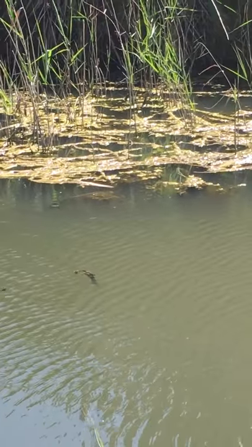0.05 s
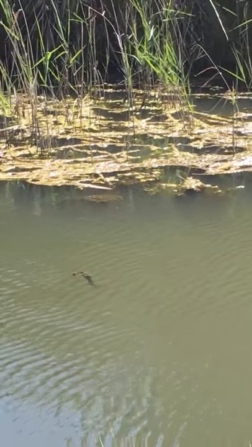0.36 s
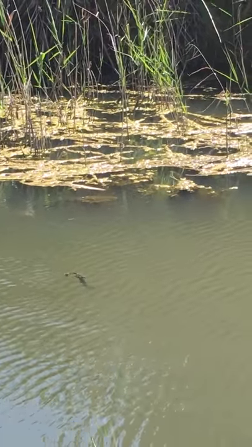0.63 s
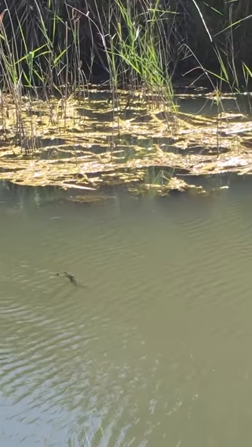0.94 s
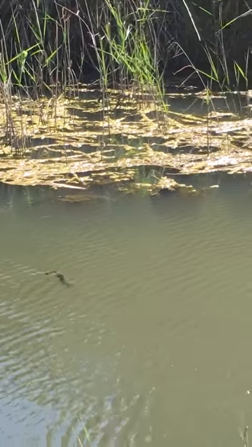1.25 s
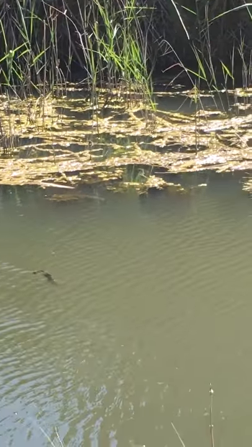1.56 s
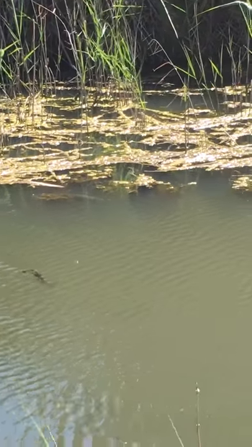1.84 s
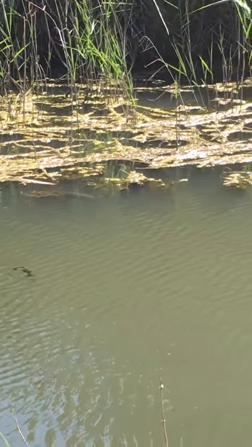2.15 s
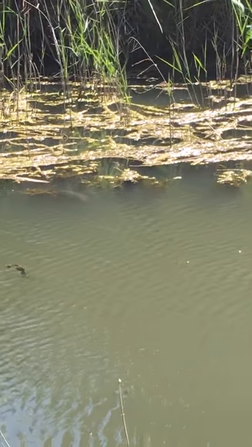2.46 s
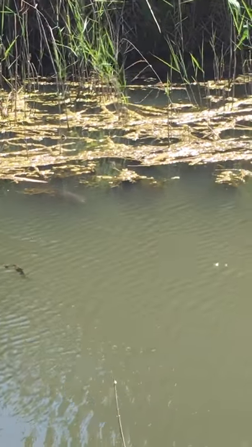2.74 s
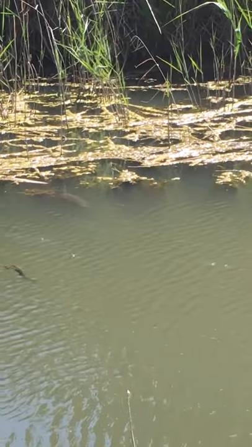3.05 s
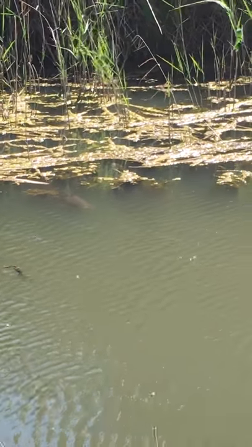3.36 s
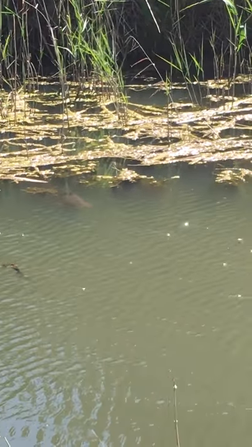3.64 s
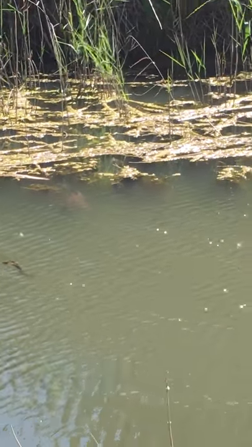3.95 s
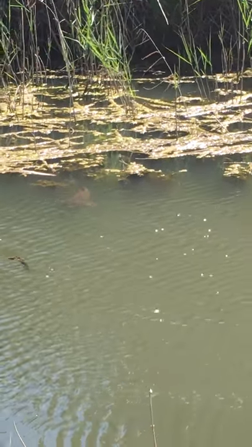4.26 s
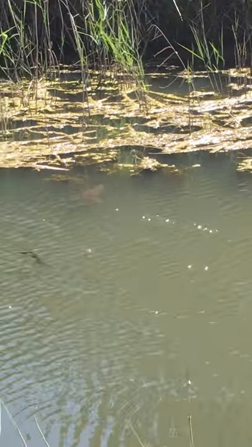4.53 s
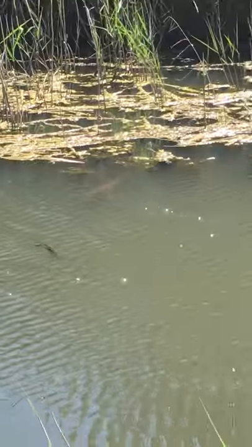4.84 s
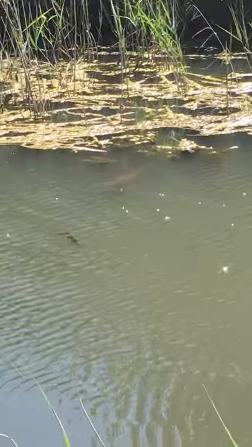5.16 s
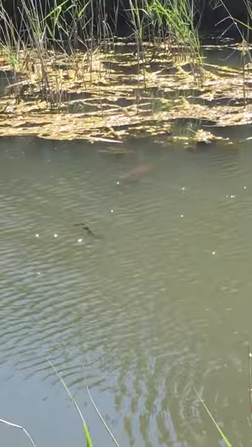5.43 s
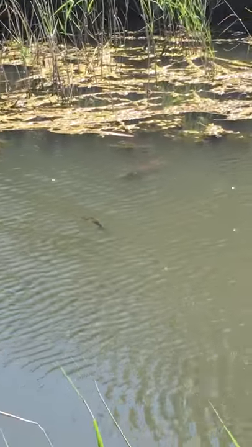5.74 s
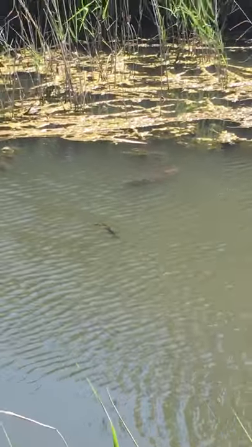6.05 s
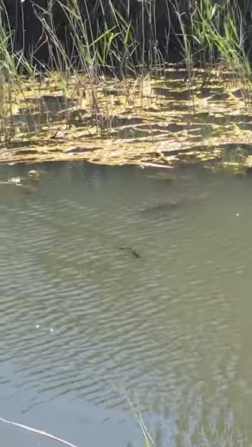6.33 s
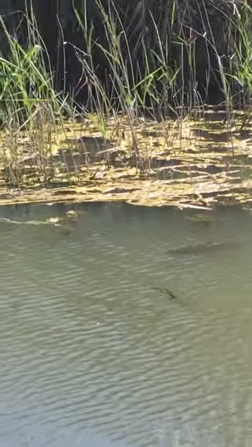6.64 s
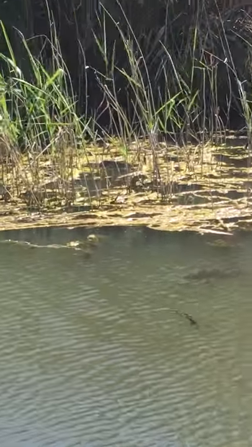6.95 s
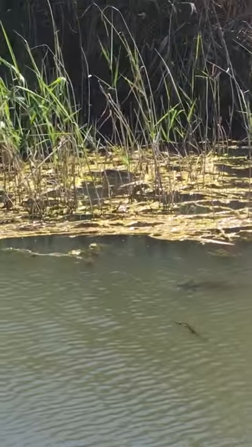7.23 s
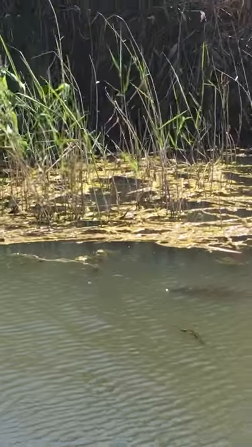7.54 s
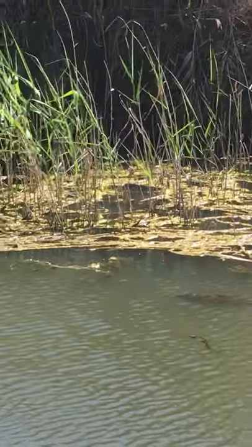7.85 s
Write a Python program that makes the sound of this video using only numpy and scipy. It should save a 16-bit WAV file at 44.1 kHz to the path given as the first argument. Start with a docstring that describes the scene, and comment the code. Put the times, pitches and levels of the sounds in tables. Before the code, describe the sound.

Wind gusts rumble and thump on the microphone while faint, distant birds chirp and whistle over a soft hiss of reeds.

```python
"""Gusts rumble and thump on the microphone beside a reedy pond.
Turbulence makes the rumble, single eddies the thumps; reed leaves brush together in a soft hiss.
Distant birds call across the water with a thin echo: falling chips, a rasp followed by a short pip,
slurs, level whistles and faint chatter. A small bird adds a thin, fluttering 'tsip'."""
import sys
import numpy as np
from scipy import signal
from scipy.fft import rfft, irfft, next_fast_len
from scipy.io import wavfile
from scipy.ndimage import uniform_filter1d, map_coordinates

SR = 44100
rng = np.random.default_rng(int(sys.argv[2]) if len(sys.argv) > 2 else 0)


def output_pcm(signal):
    """Save a mono or channel-first signal as 16-bit PCM at the path in sys.argv[1].

    Samples are clipped to [-1, 1] before scaling.
    """
    pcm = np.clip(np.atleast_2d(signal).T, -1, 1) * 32767
    wavfile.write(sys.argv[1], SR, np.round(pcm).astype(np.int16))


N = 352359
T = np.arange(N) / SR


def undb(db):
    """Decibels to gain."""
    return 10 ** (np.asarray(db) / 20)


def unit_rms(x):
    """Scale to rms 1."""
    return x / np.sqrt(np.mean(x ** 2))


def curve(table):
    """Interpolate (t/s, value) rows to one value per sample."""
    return np.interp(T, *np.transpose(table))


def colour(x, spectrum):
    """Filter by (f/Hz, level/dB) rows; rms 1."""
    hz, db = np.transpose(spectrum)
    size = next_fast_len(len(x))
    bins_hz = np.maximum(np.fft.rfftfreq(size, 1 / SR), 1)
    gain = undb(np.interp(np.log(bins_hz), np.log(hz), db))
    return unit_rms(irfft(rfft(x, size) * gain, size)[:len(x)])


def drift(rate_hz, size=N):
    """Smooth random signal, spread near 1."""
    knots = rng.standard_normal(size // 40 + 3)
    return map_coordinates(knots, [np.arange(size) * rate_hz / SR], order=2, mode="mirror")


def add(out, start_s, sound):
    """Mix a sound in at start_s."""
    i = max(int(start_s * SR), 0)
    part = sound[:max(N - i, 0)]
    out[i:i + len(part)] += part


def tone(hz):
    """Sine along a pitch track; rms 1."""
    return np.sqrt(2) * np.sin(2 * np.pi * np.cumsum(hz) / SR)


# Breeze between gusts: t/s, rumble level/dB
BREEZE_LEVELS = [(0.0, -47), (1.2, -44.5), (2.5, -34), (3.9, -45), (4.7, -45), (5.7, -40.5), (6.6, -52),
                 (7.99, -49.5)]
# Gusts: t/s at full strength, hold/s, rumble level/dB, upper bass/dB re rumble
GUST_EVENTS = [(0.124, 0.072, -40.5, -30), (0.737, .05, -39.5, -23), (1.163, .03, -38.5, -28),
               (1.45, 0.11, -27, -27), (1.586, .055, -26.5, -15.5), (1.812, 0.055, -23.5, -16.5),
               (2.001, 0.23, -27, -20), (2.222, 0.042, -20, -7.5), (2.313, 0.094, -19, -4),
               (2.428, 0.05, -25.5, -6), (2.518, 0.049, -26.5, -4.5), (2.607, 0.083, -22.5, -3),
               (2.732, .035, -25.5, -6), (2.913, .115, -30, -10.5), (3.109, 0.022, -42, -10.5),
               (3.21, 0.029, -33.5, -35), (3.325, 0.046, -30.5, -15), (3.424, 0.029, -25, -17.5),
               (3.593, 0.01, -26, -18.5), (3.652, 0.053, -23, -20.5), (4.144, 0.03, -30, -28),
               (4.233, 0.062, -34, -34), (4.388, 0.0076, -27, -25), (4.448, 0.081, -34.5, -27),
               (4.853, .05, -27.5, -18), (4.925, 0.013, -15, -10.5), (4.962, .11, -21.5, -8),
               (5.173, 0.013, -27.5, -19.5), (5.247, 0.0071, -22, -17), (5.469, 0.031, -24, -19.5),
               (5.768, 0.045, -26.5, -20.5), (5.991, 0.17, -34.5, -25), (6.374, 0.037, -39, -22.5),
               (7.426, .02, -42, -21), (7.714, 0.0093, -32, -28)]


def airflow(attack_tau_s=0.017, release_tau_s=0.016, sway_db=3.5, flap_db=1.5, breeze_bright_db=-22):
    """Gusts rise, flap and die over a swaying breeze. Returns rumble and upper-bass levels in dB."""
    rumble = undb(curve(BREEZE_LEVELS) + sway_db * drift(18))
    upper = rumble * undb(breeze_bright_db)
    for s, hold_s, db, bright_db in GUST_EVENTS:
        rise = np.minimum(T - s, 0) / attack_tau_s
        fall = np.maximum(T - s - hold_s, 0) / release_tau_s
        envelope = np.exp(rise - fall)
        rumble = np.maximum(rumble, undb(db) * envelope)
        upper = np.maximum(upper, undb(db + bright_db) * envelope)
    flapping_db = flap_db * drift(35.55)
    return 20 * np.log10(rumble) + flapping_db, 20 * np.log10(upper) + flapping_db


# Turbulence spectrum: f/Hz, relative level/dB
TURBULENCE_SPECTRUM = [(20, -54), (35, 0), (58, 8.5), (110, 5), (190, -2.5), (300, -9), (550, -24),
                       (800, -36.5), (1400, -53.5), (2600, -84)]


def wind(rumble_db, upper_db, splits_hz=(85, 220, 420), strong_db=-29, flutter_db=-2, patchy_db=5.5):
    """Turbulence on the microphone: stronger gusts bring smaller eddies, so a brighter sound."""
    flow = colour(rng.standard_normal(N), TURBULENCE_SPECTRUM)
    lowpasses = (signal.butter(4, hz, fs=SR, output="sos") for hz in splits_hz)
    deep, low, mid = (signal.sosfiltfilt(sos, flow) for sos in lowpasses)
    rumble = deep + (low - deep) * undb(0.74 * (rumble_db - strong_db))
    flutter = mid - low + (flow - mid) * undb(0.77 * (upper_db - strong_db))
    # mean pressure follows the gust closely; only the eddies are random
    rumble, flutter = (x / np.sqrt(uniform_filter1d(x ** 2, size=1800)) for x in (rumble, flutter))
    return rumble * undb(rumble_db) + flutter * undb(upper_db + flutter_db + patchy_db * drift(110))


# Hardest eddies: t/s, peak level/dB before gain_db, centre f/Hz
HARD_EDDIES = [(2.216, -9, 160), (2.228, -4.5, 203), (2.317, -9, 165), (2.336, -2, 215), (2.353, -5, 256),
               (2.400, -11, 207), (2.462, -12, 195), (2.533, -7.5, 165), (2.567, -6, 228),
               (2.603, -2.5, 209), (2.634, -0.5, 244), (2.688, -2.5, 210), (2.762, -3.5, 164),
               (3.316, -15, 213), (3.593, -22, 183), (4.881, -15, 172), (4.928, -2, 255), (4.936, 3.5, 243),
               (4.963, -7, 337), (5.008, -11.5, 218), (5.045, -11.5, 207), (5.054, -10, 233),
               (7.712, -16.5, 64), (7.763, -27, 98)]


def buffets(upper_db, gain_db=-2, strays_per_s=27, stray_over_db=5.5, scatter_db=1, db_per_octave=35):
    """Each eddy is one pressure swing: the smaller, the sharper. Random strays ride on the gusts."""
    out = np.zeros(N)
    t = np.arange(-SR // 20, SR // 20) / SR
    eddies = [(s, db + gain_db, hz) for s, db, hz in HARD_EDDIES]
    for when, strength in rng.random((int(strays_per_s * N / SR), 2)):
        db = upper_db[int(when * N)] + stray_over_db + scatter_db * (2 * strength - 1)
        hz = 230 * 2 ** (db / db_per_octave)  # harder eddies are smaller, so higher
        eddies.append((when * N / SR, db, hz))
    for (s, db, hz), phase_turns in zip(eddies, rng.random(len(eddies))):
        swing = np.exp(2j * np.pi * phase_turns) / (1 - 1j * np.pi * hz * t) ** 3
        add(out, s + t[0], undb(db) * swing.real)
    return out


# Breeze in the reeds: t/s, level/dB before hiss_gain_db
HISS_LEVELS = [(0.0, -68), (0.91, -67.5), (1.22, -63.5), (1.42, -66.5), (2.13, -61), (2.49, -65),
               (2.96, -60), (3.54, -64), (4.03, -63), (4.09, -62), (4.16, -62.5), (6.7, -64.5),
               (6.76, -63.5), (6.85, -65.5), (7.9, -67), (7.99, -65)]
# Leaf friction spectrum: f/Hz, relative level/dB
LEAF_SPECTRUM = [(500, -20), (1200, -5), (2500, -.5), (4000, 1), (4900, -1.5), (6200, 1), (7600, -1),
                 (9300, 1), (10500, -2.5), (11500, -.5), (15500, -3)]
# Stem and leaf strokes: t/s, length/s, centre f/Hz, level/dB before stroke_gain_db
LEAF_STROKES = [(2.63, .04, 7000, -59), (4.062, .071, 9050, -59), (4.986, 0.061, 4600, -57.5),
                (6.741, .04, 9100, -55), (6.912, 0.048, 4500, -58.5), (7.033, 0.038, 4520, -57)]


def reeds(hiss_gain_db=3.5, flicker_db=1.23, ticks_per_s=160, tick_db=-11, stroke_gain_db=-2):
    """Leaves brush together: smooth hiss, tiny dry ticks, a few louder strokes."""
    hiss = colour(rng.standard_normal(N), LEAF_SPECTRUM) * undb(flicker_db * drift(30))
    touches = (rng.random(N) < ticks_per_s / SR) * rng.standard_normal(N)
    contact = rng.standard_normal(SR // 500) * np.linspace(1, 0, SR // 500) ** 2
    ticks = colour(signal.fftconvolve(touches, contact)[:N], LEAF_SPECTRUM) * undb(tick_db)
    out = (hiss + ticks) * undb(curve(HISS_LEVELS) + hiss_gain_db)
    for s, length_s, hz, db in LEAF_STROKES:
        u = np.linspace(0, 1, int(length_s * SR))
        stroke = colour(rng.standard_normal(len(u)), [(hz / 2, -14), (hz, 0), (hz * 2, -20)])
        envelope = np.minimum(10 * u, 1) * np.sqrt(1 - u)
        add(out, s, undb(db + stroke_gain_db) * stroke * envelope)
    return out


# Falling chips: t/s near mid-fall, level/dB before gain_db, length/s
CHIP_CALLS = [(1.280, -55, 0.066), (1.414, -53, 0.069), (1.557, -57, 0.073), (1.73, -54, 0.092),
              (1.888, -54, 0.064), (2.013, -55, .07), (2.193, -55, 0.08), (2.332, -55, 0.047),
              (2.498, -56, 0.054), (2.753, -53.5, 0.076), (2.913, -56.5, .08), (5.533, -55, 0.04),
              (5.671, -58, 0.051), (6.098, -52, 0.06), (6.252, -54.5, 0.065)]
# Chip contour: relative position (0 = mid-fall), f/Hz, relative level/dB
CHIP_CONTOUR = [(-.62, 2800, -13), (-.42, 2980, -6), (-.2, 2820, -7), (0, 2400, 0), (.2, 1950, -3),
                (.45, 1550, -18)]


def chips(gain_db=-2.5, ripple_spacing_hz=500, ripple_db=1.0):
    """A bird's chip hooks over softly, then drops almost an octave."""
    out = np.zeros(N)
    position, contour_hz, contour_db = np.transpose(CHIP_CONTOUR)
    for s, db, length_s in CHIP_CALLS:
        size = int(length_s * SR)
        u = np.linspace(position[0], position[-1], size)
        hz = np.interp(u, position, contour_hz) * (1 + .018 * drift(260, size))
        # a second path off the water beats with the direct one as the pitch sweeps
        fading_db = ripple_db * (np.cos(2 * np.pi * (hz - 2400) / ripple_spacing_hz) - 1)
        level_db = db + gain_db + np.interp(u, position, contour_db) + fading_db
        envelope = undb(level_db) * signal.windows.tukey(size, .15)
        add(out, s + position[0] * length_s, tone(hz) * envelope)
    return out


def note(length_s, start_hz, end_hz, waver, fade_db=2.5, edge_s=0.01):
    """A pure gliding note swells and dies; moving air makes it waver and fade."""
    size = int(length_s * SR)
    hz = np.geomspace(start_hz, end_hz, size) * (1 + waver * drift(114, size))
    arch = 1 - 0.36 * np.linspace(-1, 1, size) ** 2
    envelope = signal.windows.tukey(size, 2 * edge_s / length_s) * arch
    return tone(hz) * envelope * undb(fade_db * drift(61, size))


# Rasp-and-pip calls: pip t/s, rasp level/dB, pip level/dB (both before their gains)
RASP_CALLS = [(1.653, -58, -52), (2.131, -58, -49.5), (2.570, -58, -50), (3.014, -57.5, -50.5),
              (3.461, -56, -50), (4.253, -55.5, -49.5), (4.899, -52, -55), (5.367, -54, -50),
              (5.887, -53.5, -48.5), (6.433, -53, -48)]
# Rasp resonances: f/Hz, relative level/dB
RASP_SPECTRUM = [(700, -22), (1150, 6.5), (1500, -10), (1850, 2.5), (2450, 8.5), (2800, 0.5), (3150, 7),
                 (3700, -7), (5000, -26)]


def rasps(lead_s=.105, length_s=0.1, pitch_hz=615, hoarseness=0.58,
          rasp_gain_db=-2, pip_gain_db=-3, after_gain_db=-14):
    """A hoarse burst of uneven pulses, a clear pip, then a faint lower after-note."""
    out, size = np.zeros(N), int(length_s * SR)
    envelope = np.sin(np.linspace(0, np.pi, size))
    for s, rasp_db, pip_db in RASP_CALLS:
        hz = pitch_hz * (1 + .06 * drift(600, size) + .02 * drift(50, size))
        harmonics = sum(tone(k * hz) * (1 + 0.71 * drift(114, size)) for k in range(2, 7))
        noise = colour(rng.standard_normal(size), RASP_SPECTRUM)
        rasp = unit_rms(colour(harmonics, RASP_SPECTRUM) + hoarseness * noise)
        add(out, s - lead_s, undb(rasp_db + rasp_gain_db) * rasp * envelope)
        add(out, s, undb(pip_db + pip_gain_db) * note(0.038, 1482, 1428, waver=0.007))
        add(out, s + 0.045, undb(pip_db + after_gain_db) * note(0.0624, 1290, 1132, waver=0.025))
    return out


# Thin arched calls: t/s at the top, top f/Hz, level/dB before gain_db
TSIP_CALLS = [(0.169, 7100, -52.5), (1.887, 6840, -51.5), (3.607, 6760, -49), (5.223, 6800, -45.5),
              (5.823, 6570, -55), (6.615, 6430, -58.5)]


def tsips(length_s=0.063, pitch_sag=0.17, flutter_hz=145, flutter_rms=0.32, gain_db=-2):
    """A small bird's high arch of pitch, fluttering quickly in loudness."""
    out, size = np.zeros(N), int(length_s * SR)
    u = np.linspace(-1, 1, size)
    envelope = np.cos(np.pi * u / 2)
    for s, top_hz, db in TSIP_CALLS:
        hz = top_hz * (1 - pitch_sag * np.sin(np.pi * np.abs(u) / 2) ** 1.6)
        flutter = 1 + flutter_rms * tone(flutter_hz * (1 + 0.12 * drift(60, size)))
        add(out, s - length_s / 2, undb(db + gain_db) * tone(hz) * flutter * envelope)
    return out


# Slurred notes: t/s, length/s, start f/Hz, end f/Hz, level/dB
SLUR_CALLS = [(.445, 0.036, 1726, 1440, -63), (0.614, 0.06, 2010, 1380, -57.5),
              (0.852, 0.024, 2050, 1680, -54), (1.071, 0.073, 2130, 1430, -58),
              (1.16, 0.043, 1810, 1720, -54), (1.165, .06, 2890, 2490, -62.5),
              (1.199, 0.04, 1673, 1515, -52), (1.244, 0.039, 1450, 1380, -51.5),
              (1.29, 0.052, 1497, 1307, -51), (1.286, .03, 2120, 1960, -55.5),
              (1.31, 0.04, 1905, 1400, -53.5), (1.708, 0.048, 1424, 1463, -52.5),
              (2.18, 0.055, 1410, 1413, -58), (2.96, 0.034, 1830, 1760, -58),
              (5.855, 0.029, 1880, 1700, -60), (5.926, 0.08, 1430, 1368, -54),
              (7.151, .04, 1045, 1081, -58.5)]
# Long whistles: t/s, length/s, start f/Hz, end f/Hz, level/dB before whistle_gain_db
WHISTLE_CALLS = [(0.459, 0.24, 1232, 1220, -64.5), (1.275, 0.18, 973, 964, -60),
                 (1.548, 0.069, 3160, 3110, -65), (1.866, 0.26, 1250, 1234, -62.5),
                 (2.023, 0.106, 1954, 1890, -64.5), (2.171, 0.21, 1572, 1563, -62.5),
                 (4.825, 0.12, 3400, 3350, -66), (4.957, 0.17, 3330, 3280, -68),
                 (5.68, 0.205, 1457, 1396, -66), (6.931, 0.22, 1236, 1262, -68),
                 (7.27, 0.226, 1584, 1540, -64), (7.352, 0.11, 3353, 3350, -64),
                 (7.508, 0.1, 3250, 3380, -67), (7.605, .17, 1400, 1400, -71.5),
                 (7.869, 0.15, 1073, 1075, -64)]


def whistlers(whistle_gain_db=2, decay_db=-5):
    """Birds sing quick slurs and long, nearly level whistles that fade as they go."""
    out = np.zeros(N)
    for s, length_s, start_hz, end_hz, db in SLUR_CALLS:
        add(out, s, undb(db) * note(length_s, start_hz, end_hz, waver=.02))
    for s, length_s, start_hz, end_hz, db in WHISTLE_CALLS:
        whistle = note(length_s, start_hz, end_hz, waver=.002)
        add(out, s, whistle * undb(db + whistle_gain_db + np.linspace(0, decay_db, len(whistle))))
    return out


def chatter(level_db=-68, low_hz=950, high_hz=2600, count=45):
    """Birds much farther off: brief falling notes, the higher ones fainter."""
    out = np.zeros(N)
    for when, height, duration, fall in rng.random((count, 4)):
        hz = low_hz * (high_hz / low_hz) ** (height ** 2)
        call = note(0.0338 + 0.031 * duration, hz, hz * (1 - 0.133 * fall), waver=0.029)
        add(out, when * N / SR, undb(level_db - 1.7 * height) * call)
    return out


def bank_echo(calls, wet_db=-8, t60_s=.45, delay_s=.008):
    """Reeds and banks scatter a thin echo behind the direct sound."""
    t = np.arange(SR // 2) / SR
    response = rng.standard_normal(len(t)) * undb(-60 * t / t60_s) * (t > delay_s)
    echo = signal.fftconvolve(calls, response / np.linalg.norm(response))[:N]
    return calls + undb(wet_db) * echo


# Far open-air spectrum: f/Hz, relative level/dB
AIR_SPECTRUM = [(20, -18), (42, 5.5), (58, 11), (80, -0.5), (130, -5), (250, -41), (400, -13.5),
                (1000, -11.5), (1400, -15), (2000, -19), (3500, -26), (15000, -36.5)]


def open_air(level_db=-56.5, sway_db=0.5):
    """Far background noise of open country."""
    return colour(rng.standard_normal(N), AIR_SPECTRUM) * undb(level_db + sway_db * drift(9))


def scene():
    """Wind close by, reeds and birds across the water, in mono; only the far calls echo."""
    birds = bank_echo(whistlers() + chips() + rasps() + chatter()) + tsips()
    rumble_db, upper_db = airflow()
    return (wind(rumble_db, upper_db) + reeds() + open_air() + birds + buffets(upper_db))[None]


def record(dry):
    """Soft clipping rounds the hardest thumps; a steep low-pass cuts the top."""
    ceiling, cutoff_hz = .85, 15750
    rounded = ceiling * np.tanh(dry / ceiling)
    return signal.sosfilt(signal.ellip(10, .1, 80, cutoff_hz, fs=SR, output="sos"), rounded)


dry = scene()
out = record(dry)
output_pcm(out)
```